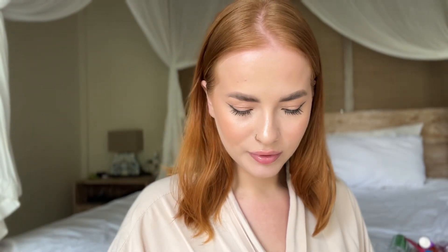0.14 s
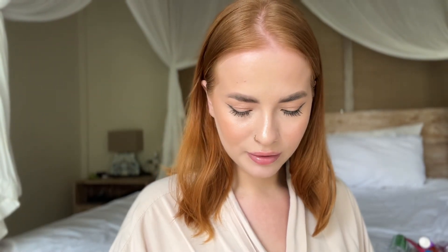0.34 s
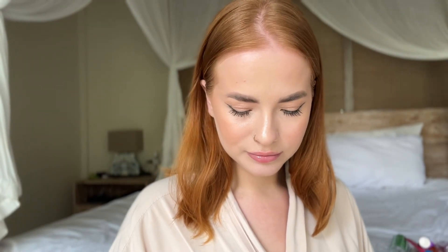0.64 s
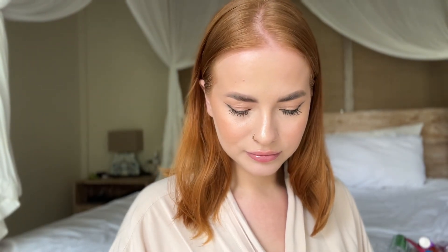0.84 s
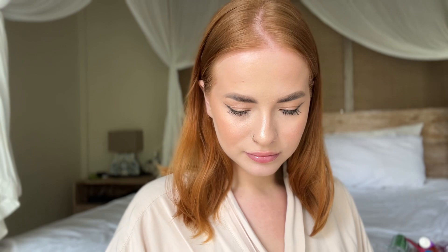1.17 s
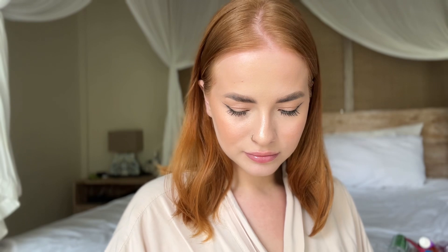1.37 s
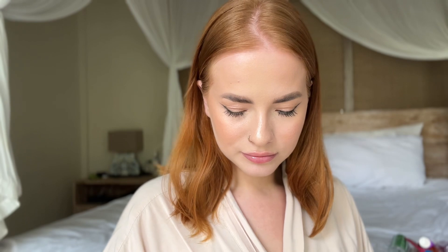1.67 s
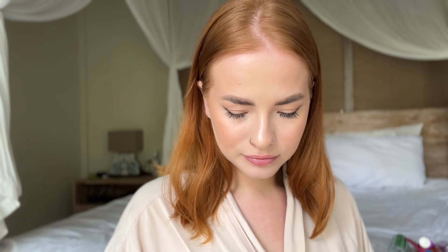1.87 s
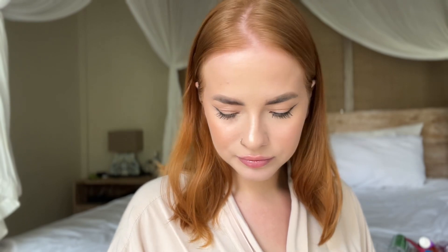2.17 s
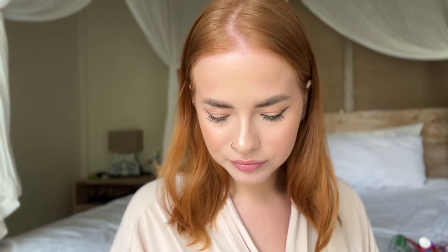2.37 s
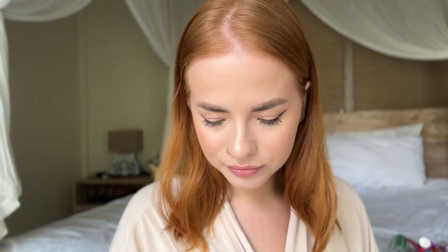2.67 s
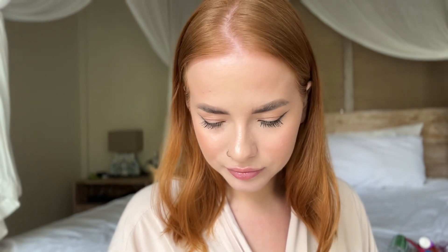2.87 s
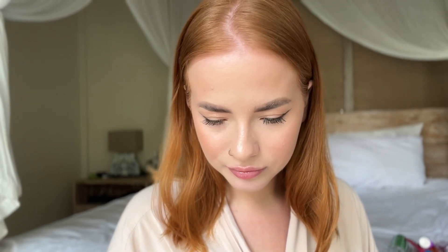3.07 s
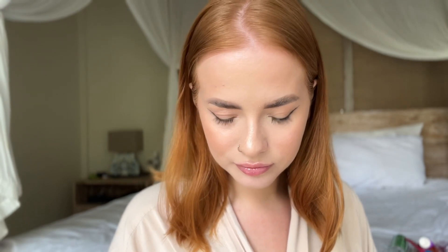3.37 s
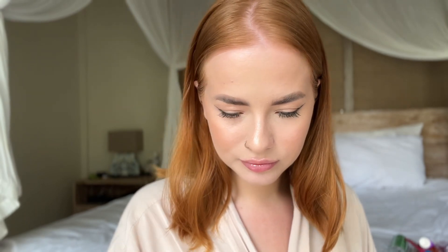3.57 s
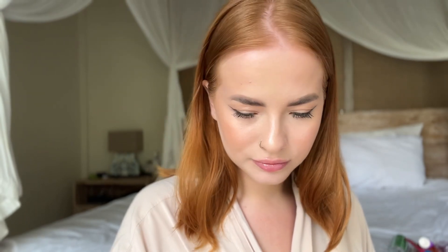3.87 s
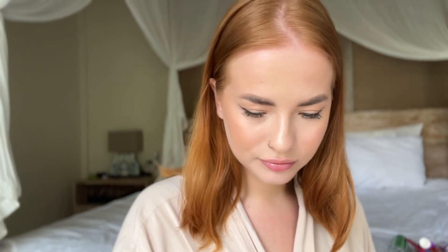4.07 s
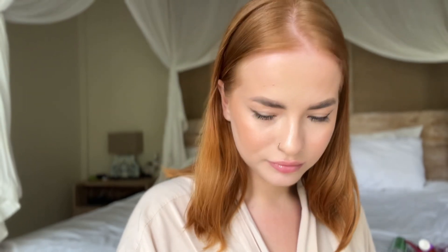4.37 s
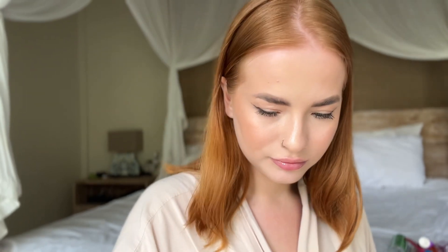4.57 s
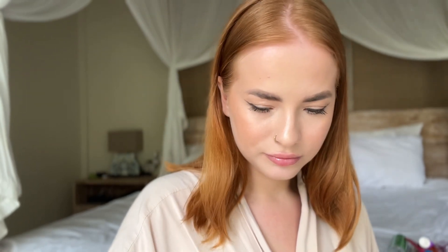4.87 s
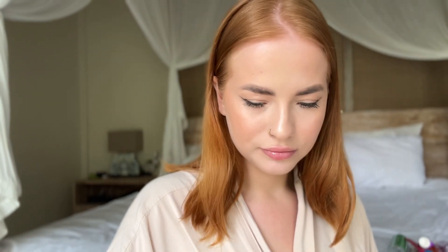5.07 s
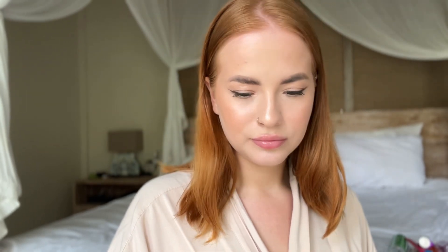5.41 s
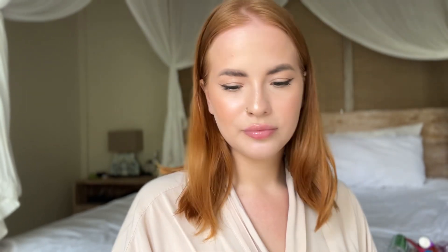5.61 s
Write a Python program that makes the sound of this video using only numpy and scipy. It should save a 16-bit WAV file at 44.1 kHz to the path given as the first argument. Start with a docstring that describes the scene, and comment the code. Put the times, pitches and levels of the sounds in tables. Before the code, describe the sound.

A close stereo pickup in a small quiet bedroom, with soft low hum, slight hiss and a very short room tail. From 0 to 0.3 s, plastic jars rattle together on a hard table: quick hollow clicks, a light dragging rattle and one firmer knock near 0.25 s. Quiet follows until a faint, low stuttering creak of a jar base at about 1.35-1.43 s. From 1.65 to 2.5 s comes the busiest handling: dense, irregular clacks with dull table thuds and brief rattling slips, with the sharpest, loudest crack at 1.75 s and another strong one at 2.27 s. It is then almost still, with tiny taps near 3.15-3.25 s and crisp, thin clicks at 3.6-3.75 s. From 4.1 to 4.75 s, lighter ticks and faint scrapes return in clusters. After a short pause, soft, duller knocks and slight drags continue from 5.1 s to the end, about 5.6 s.

```python
"""In a quiet bedroom, plastic jars are shuffled about on a hard table top, close to a two-port microphone.
Each knock is a click of shaped noise, a short ring of jar tones and a thud of lower table tones.
Dragging is a rattle of many tiny random slips; one jar base creaks through slips at an uneven rate.
Random echoes give a short room tail, and coloured noise gives a soft hum with a little hiss."""
import sys
import numpy as np
from scipy import signal
from scipy.fft import rfft, irfft
from scipy.io import wavfile
from scipy.ndimage import uniform_filter1d

SR = 44100
rng = np.random.default_rng(int(sys.argv[2]) if len(sys.argv) > 2 else 0)


def wav_out(sig):
    """Save sig, one row per channel (or a flat mono array), as 16-bit PCM at SR to the path in sys.argv[1]."""
    wavfile.write(sys.argv[1], SR, np.round(np.clip(np.atleast_2d(sig).T, -1, 1) * 32767).astype(np.int16))


N = 253287  # length in samples


def gain_of(db):
    """Turns decibels into amplitude."""
    return 10 ** (np.asarray(db) / 20)


def evened(x):
    """Scales a signal to an average (rms) strength of 1."""
    return x / np.sqrt(np.mean(x ** 2) + 1e-20)


def read(points, hz):
    """Reads a table of (pitch, value) between its points, along a log-frequency axis."""
    f, value = np.transpose(points)
    return np.interp(np.log(hz + 1), np.log(f + 1), value)


def coloured(x, spectrum):
    """Filters sound without looking ahead: the phase follows from the log of the wanted gain."""
    hz = abs(np.fft.fftfreq(2048, 1 / SR))
    log_gain = np.log(gain_of(np.maximum(read(spectrum, hz), -80)))
    response = np.exp(np.conj(signal.hilbert(log_gain)))
    taps = np.fft.ifft(response).real[:1024]
    return signal.oaconvolve(x, taps[None] / np.linalg.norm(taps), axes=1)[:, :N]


def ring(modes, struck_hz, spread, rise_s, length):
    """A blow excites mostly the tones near the struck pitch; length scales their fading; peak 1."""
    t = np.arange(SR // 5) / SR
    hz, db, t60 = np.transpose(modes)[:, :, None]
    near_db = -20 * (np.log2(hz / struck_hz) / spread) ** 2  # spread in octaves
    decay_db = -60 * t / (t60 * length)
    tones = gain_of(db + np.maximum(near_db, -30) + decay_db) * np.sin(2 * np.pi * hz * t)
    sound = tones.sum(0) * (1 - np.exp(-t / rise_s)) ** 2
    return sound / abs(sound).max()


def add(mix, s, sound, pan_db):
    """Adds a sound to both channels at time s; pan_db is left minus right."""
    at = round(s * SR)
    part = mix[:, at:at + len(sound)]
    part += gain_of([[pan_db / 2], [-pan_db / 2]]) * sound[:part.shape[1]]


# Knocks, with levels relative to the other layers: start_s, click_level_db, click_pitch_hz,
# jar_level_db, jar_struck_pitch_hz, table_level_db, table_struck_pitch_hz
KNOCKS = [(0.024, -47, 2190, -35.5, 665, -40.5, 374), (0.049, -51, 7300, -23.0, 670, -29.0, 507),
          (0.088, -37, 2600, -26, 770, -32, 362), (0.1003, -27.5, 6940, -21.5, 806, -32, 385),
          (0.1112, -33.5, 5000, -21.5, 780, -28, 380), (0.1498, -31, 2100, -19.5, 780, -40, 415),
          (0.1859, -38.5, 2180, -34.5, 1910, -37, 328), (0.194, -39, 3600, -31, 690, -33, 246),
          (0.23, -46, 2200, -44, 690, -37, 400), (0.2476, -22.5, 3130, -9, 670, -22.5, 400),
          (0.2667, -34, 2200, -25, 670, -30, 374), (0.2788, -21.5, 8700, -19.5, 806, -31, 458),
          (0.2882, -25.5, 2200, -21.5, 710, -26.5, 480), (1.6573, -22, 6160, -23, 980, -26.5, 341.5),
          (1.726, -20.0, 6450, -19.5, 727, -24, 445), (1.7376, -42, 4400, -18, 950, -26, 380),
          (1.7558, -2.5, 6500, -8, 1020, -17.5, 393), (1.765, -46, 5200, -24.0, 1090, -54, 300),
          (1.7996, -29, 6100, -23.0, 1080, -33.5, 188), (1.816, -32, 7260, -37, 1160, -42.0, 400),
          (1.904, -34.5, 7040, -45.0, 800, -59.0, 192), (1.918, -28, 7000, -33, 860, -38, 400),
          (1.927, -19.5, 7440, -18, 950, -33, 549), (1.9382, -26, 2700, -24.5, 640, -36, 430),
          (1.955, -27.5, 6440, -30, 725, -25.5, 338), (1.9694, -25.5, 7300, -23.5, 1090, -36, 394),
          (1.998, -46, 2200, -30, 740, -30.0, 390), (2.0332, -37, 4400, -26, 820, -51, 410),
          (2.055, -17, 3700, -18.5, 1457, -17.5, 413), (2.071, -30.0, 3900, -21, 784, -35, 310),
          (2.0831, -19.5, 5950, -29, 850, -29, 386), (2.092, -34.0, 5200, -34, 774, -22, 236),
          (2.1065, -33, 3800, -25.5, 930, -29, 180), (2.116, -34, 6400, -36, 980, -53, 400),
          (2.188, -32, 2200, -24, 1280, -24, 347), (2.2025, -15.5, 6560, -16.5, 884, -22, 278),
          (2.2104, -34, 6400, -26.0, 980, -26.5, 191), (2.217, -29.0, 2600, -30.5, 1510, -28.5, 400),
          (2.274, -7.5, 5700, -10, 1166, -18.5, 342), (2.3079, -16, 6300, -16.5, 1170, -25.5, 435),
          (2.3338, -20, 4000, -19.5, 940, -25, 238), (2.414, -17, 2200, -16.5, 777, -22.5, 355),
          (2.44, -37.0, 4300, -32, 940, -34, 400), (2.4609, -36, 3180, -27.5, 790, -37, 400),
          (2.561, -50.0, 3900, -39.5, 705, -44, 415), (3.143, -44.5, 6300, -44.5, 1220, -45, 312),
          (3.2412, -41.5, 3900, -36, 854, -41.5, 337), (3.255, -54, 2224, -38.5, 1003, -43.5, 186),
          (3.6228, -22, 7600, -37, 1680, -46.0, 151), (3.648, -35.5, 7600, -65.0, 1820, -62, 218),
          (3.668, -33.5, 7000, -43.5, 920, -46, 155), (3.741, -42, 2200, -53, 1470, -42, 300),
          (3.833, -63.0, 7600, -48, 930, -59.0, 400), (4.065, -59.0, 2200, -48.0, 890, -47, 445),
          (4.139, -26.5, 4760, -37, 1550, -36, 300), (4.153, -46, 2200, -41.0, 1500, -34.5, 300),
          (4.1677, -16, 4400, -21.5, 1610, -41, 410), (4.1802, -18.5, 2300, -28, 2380, -31, 380),
          (4.195, -33, 4300, -33, 1550, -33.5, 400), (4.2256, -36.5, 4100, -32.5, 542, -41, 467),
          (4.3226, -65.0, 7000, -47, 650, -33, 243), (4.3777, -37.5, 2160, -45, 530, -45, 294),
          (4.467, -42.5, 2200, -41.5, 880, -47.5, 148), (4.5007, -33.0, 3500, -36, 546, -34, 287),
          (4.509, -38, 2200, -40.0, 1580, -40, 400), (4.5344, -16.5, 6500, -27, 980, -28.5, 480),
          (4.5664, -36, 6700, -41, 640, -31, 234), (4.597, -34.5, 2230, -44, 1080, -58, 172),
          (4.632, -37, 2200, -36.5, 1310, -46, 480), (4.6417, -31.5, 4640, -29.5, 770, -34.5, 184),
          (4.662, -26, 2500, -25.5, 800, -52.0, 193), (4.6948, -34.5, 2200, -33.5, 815, -35.5, 330),
          (4.7127, -28.5, 7600, -34, 1880, -38.5, 200), (5.1103, -28.5, 3370, -25.5, 720, -33, 400),
          (5.141, -41.0, 4600, -48, 600, -34, 410), (5.161, -36, 2700, -44, 786, -32, 308),
          (5.189, -41.5, 3600, -36.5, 515, -35.5, 474), (5.272, -53, 7300, -35.5, 705, -32.0, 430),
          (5.3312, -38, 7200, -31.5, 610, -22.5, 510), (5.349, -40, 3900, -50, 600, -36, 480),
          (5.371, -25, 4770, -28.5, 656, -21.5, 423), (5.3858, -60.0, 3900, -57.0, 624, -31.5, 400),
          (5.453, -29.5, 2960, -26.5, 1040, -28, 398), (5.5653, -48.5, 6400, -37, 780, -32, 190)]
# Tones of the jars: pitch_hz, relative_level_db, time_to_fade_60_db_s (before length scaling)
JAR_TONES = [(670, 15, 0.023), (780, 12.5, 0.024), (884, 13.5, 0.019), (980, 19.5, 0.024),
             (1160, 21.5, 0.023), (1350, 21.5, 0.028), (1665, 15, 0.029), (1890, 14, 0.024),
             (2270, 5.5, 0.017)]
# Tones of the table top: pitch_hz, relative_level_db, time_to_fade_60_db_s (before length scaling)
TABLE_TONES = [(80, -18, 0.064), (146.5, -15, 0.19), (188, -2, 0.12), (240, -4.5, 0.046), (300, 6.5, 0.049),
               (400, 8.5, 0.071), (480, 15, 0.045)]
JAR_PAN_DB, TABLE_PAN_DB = -6.5, -2.5  # left minus right
SOFT_DB, HARD_DB = -28.5, -7  # click levels that count as soft and hard
SOFT_RING, HARD_RING = 0.7, 0.42  # ring length factors
SAG_DB = -7  # flex of the whole table top, relative to the thud
JAR_RISE_CYCLES, TABLE_RISE_CYCLES = 1.1, 0.85  # a blow that favours low tones is softer and slower


def knocks():
    """A blow cracks at the rim, then sets the jar and the table ringing."""
    clicks, rings, t = np.zeros((2, N)), np.zeros((2, N)), np.arange(1500) / SR
    noises = rng.standard_normal((len(KNOCKS), 1500))
    linger = gain_of(-20.5) * np.exp(-t / 0.0037)  # a faint noisy tail lingers after the crack
    shape = (1 - np.exp(-t / 0.00086)) ** 2 * (1.39 * np.exp(-t / 0.0015) + linger)
    sag = ring(TABLE_TONES, 80, .6, 0.0077, 0.38)  # blows flex the whole table top
    for knock, noise in zip(KNOCKS, noises):
        s, click_db, click_hz, jar_db, jar_hz, table_db, table_hz = knock
        # the tighter grip behind a harder blow shortens the ring
        hard = np.clip((click_db - SOFT_DB) / (HARD_DB - SOFT_DB), 0, 1) ** 2
        length = SOFT_RING + hard * (HARD_RING - SOFT_RING)
        # the struck rim colours the crack
        rim = 1.666 * signal.lfilter(*signal.iirpeak(click_hz, 1.8, SR), noise)
        # a low click is a dull one
        edge = signal.lfilter(*signal.butter(1, min(2 * click_hz, SR / 3), fs=SR), noise)
        jar = ring(JAR_TONES, jar_hz, 0.41, JAR_RISE_CYCLES / jar_hz, length)
        thud = ring(TABLE_TONES, table_hz, 0.39, TABLE_RISE_CYCLES / table_hz, length)
        add(clicks, s, gain_of(click_db) * shape * (0.87 * edge + rim), 0)
        add(rings, s, gain_of(jar_db) * jar, JAR_PAN_DB)
        add(rings, s, gain_of(table_db) * thud, TABLE_PAN_DB)
        add(rings, s, gain_of(table_db + SAG_DB) * sag, TABLE_PAN_DB)
    return clicks, rings


# Jars dragging and rattling: full_level_start_s, hold_s, relative_level_db,
# treble_share_db, rubbed_jar_pitch_hz
DRAGS = [(0.007, 0.29, -42.5, -13, 840), (1.749, 0.037, -31, -13, 1030), (1.84, 0.086, -51, -8, 1160),
         (1.943, 0.063, -48.5, -20, 920), (2.043, 0.022, -31.5, -12, 950), (2.123, 0.04, -57, -12, 980),
         (2.199, 0.0057, -31, -15, 1330), (2.33, 0.11, -74, -2, 1000), (2.424, 0.0059, -32.5, -13, 980),
         (3.24, 0.014, -52.5, -9, 916), (3.667, 0.039, -59, 2.5, 990), (4.117, 0.016, -59, 2, 1600),
         (4.16, 0.041, -39, -7.5, 1430), (4.365, 0.093, -55.5, -6, 796), (4.578, 0.062, -44, -11.5, 980),
         (4.704, 0.15, -51.5, -12.5, 800), (5.12, 0.042, -43, -14.5, 750), (5.25, 0.15, -52, -13, 700),
         (5.478, 0.096, -61, -20, 995)]
DRAG_RISE_DB_PER_S, DRAG_FALL_DB_PER_S = 241, 201


def drags():
    """Many tiny slips of uneven size shake jar and table; their edges give a fine crackle."""
    t, treble = np.arange(N) / SR, np.zeros(N)
    modes, u = np.concatenate([JAR_TONES, TABLE_TONES]), np.arange(SR // 5) / SR
    on_jar = np.arange(len(modes)) < len(JAR_TONES)
    level = np.zeros((len(modes), N))
    for s, hold_s, db, treble_db, rubbed_hz in DRAGS:
        span = slice(max(round((s - .25) * SR), 0), round((s + hold_s + .25) * SR))
        before = np.maximum(s - t[span], 0)
        after = np.maximum(t[span] - s - hold_s, 0)
        stroke = gain_of(db - DRAG_RISE_DB_PER_S * before - DRAG_FALL_DB_PER_S * after)
        # jar tones near the rubbed pitch stand out
        near_db = np.maximum(7 - 20 * (np.log2(modes[:, 0] / rubbed_hz) / .8) ** 2, -8) * on_jar
        level[:, span] += gain_of(near_db)[:, None] * stroke
        treble[span] += gain_of(treble_db) * stroke
    sizes = gain_of(2.5 * np.minimum(rng.exponential(1, N), 5))
    slips = sizes * (rng.random(N) < 1200 / SR)  # about 1200 slips per second
    slips = evened(slips * rng.choice([-1, 1], N))
    struck, shaken = rng.integers(0, len(modes), N), 0  # each slip shakes one tone
    for k, (hz, db, t60) in enumerate(modes):
        tone_db = db - 9.26 * np.log2(hz / 400) - 2.14 * (hz < 600)
        tone = gain_of(tone_db - 60 * u / (0.71 * t60)) * np.sin(2 * np.pi * hz * u)
        tone = tone * (1 - np.exp(-u / 0.0017))
        shaken = shaken + signal.oaconvolve(level[k] * slips * (struck == k), tone)[:N]
    # crackle comes in clumps
    gusts = gain_of(3.0 * evened(uniform_filter1d(rng.standard_normal(N), 150)))
    crackle = evened(gusts * (slips + .8 * rng.standard_normal(N))) * treble
    return crackle, gain_of([[-23], [-21]]) * shaken


# A jar base creaking: time_s, relative_level_db, slips_per_s (before the rate wavers)
CREAK = [(1.35, -51, 149), (1.365, -46, 160), (1.416, -41.5, 180), (1.431, -45, 148)]


def creak():
    """A jar base sticks and slips at a wavering rate; each slip is a small blow on jar and table."""
    s, db, rate = np.transpose(CREAK)
    t = np.arange(N) / SR
    waver = 1 + .12 * evened(uniform_filter1d(rng.standard_normal(N), 300))
    count = np.cumsum(np.interp(t, s, rate, 0, 0) * waver) / SR
    slip_db = np.interp(t, s, db) + 1.3 * rng.standard_normal(N)
    slips = np.diff(np.floor(count), prepend=0) * gain_of(slip_db)  # one slip per whole count
    late = np.clip((t - s[0]) / (s[-1] - s[0]), 0, 1)
    jar = 0
    for k, hz in enumerate([1400, 1080, 800]):  # the contact moves inwards, to lower jar tones
        share = np.maximum(1 - abs(2 * late - k), 0)
        jar = jar + signal.oaconvolve(slips * share, ring(JAR_TONES, hz, .35, 0.0005, 0.9))
    blow = 1.4 * ring(TABLE_TONES, 630, 0.285, 0.001, 0.55)
    squeak = gain_of(-15.5) * ring([(4160, 0, 0.013)], 4250, 1, .0003, 1)  # the rim squeaks faintly
    return gain_of([[-2.5], [2.5]]) * (jar + signal.oaconvolve(slips, blow + squeak))[:N]


# Tone colour of clicks and crackle: pitch_hz, relative_level_db (per hz)
CLICK_COLOUR = [(900, -29.5), (1500, -11.5), (1950, -7), (2500, -5.5), (3400, -10), (5600, -16.5),
                (7600, -24.5), (10000, -17.5), (13500, -30.5), (16000, -33)]
# Treble change on the left port: pitch_hz, gain_db
LEFT_SHADE = [(1500, 6.5), (3000, -10.5), (5000, -15), (8000, -14), (14000, 2.5)]


def bright_edges(clicks, crackle):
    """Filters give clicks and crackle one tone colour, with much of the treble shaded on the left."""
    treble = coloured(clicks + crackle, CLICK_COLOUR)
    hz = np.fft.rfftfreq(N, 1 / SR)
    treble[0] = irfft(rfft(treble[0]) * gain_of(read(LEFT_SHADE, hz)), N)
    return treble


# How fast the room tail dies: pitch_hz, time_to_fade_60_db_s
ROOM_FADE = [(150, 0.13), (600, 0.23), (2500, 0.092), (8000, 0.17)]


def room(x):
    """Sparse echoes of random sign, different for each port, with each band dying at its own speed."""
    taps = np.zeros((2, SR // 2))
    slots = np.arange(120, SR // 2 - 20, 20)
    at = slots + rng.integers(0, 20, (2, len(slots)))
    np.put_along_axis(taps, at, rng.choice([-1., 1.], at.shape), 1)
    hz, t, z = signal.stft(taps, SR, nperseg=128)
    fade = gain_of(-60 * t / read(ROOM_FADE, hz)[:, None])
    tail = signal.istft(z * fade, SR, nperseg=128)[1]
    return signal.fftconvolve(x[None], tail / np.linalg.norm(tail[0]), axes=1)[:, :N]


# Tone colour of hum and hiss: pitch_hz, relative_level_db (per hz)
AIR_COLOUR = [(20, -46.5), (65, 0.5), (107, -8.5), (142, -2.5), (168, -7.5), (285, -10), (367, -18.5),
              (513, -19.5), (780, -27), (2080, -27.5), (3070, -32.5), (12800, -47.5), (16000, -69.5)]
# How alike the two channels are: pitch_hz, likeness (1 same, 0 unrelated, -1 opposite)
AIR_SAME = [(60, 0.95), (180, 0.82), (550, 0.14), (1650, -0.27), (4970, 0.24), (15000, -0.79)]
# Balance of the channels: pitch_hz, left_minus_right_db
AIR_BALANCE = [(60, -1.5), (240, -1), (3770, 3.0), (15000, 0)]
AIR_DB = -50  # overall rms level


def air():
    """Room hum and microphone hiss: random short-time spectra with faint drifting patches."""
    frames, hz = N // 512 + 5, np.fft.rfftfreq(2048, 1 / SR)
    a, b, c, d, patches = rng.standard_normal((frames, 1025, 5)).T
    patches = evened(uniform_filter1d(uniform_filter1d(patches, 20, 0), 8, 1))
    same = np.clip(read(AIR_SAME, hz), -1, 1)[:, None]
    left = a + 1j * b
    right = same * left + np.sqrt(1 - same ** 2) * (c + 1j * d)
    tilt_db = read(AIR_BALANCE, hz)[:, None] / 2
    colour_db = read(AIR_COLOUR, hz)[:, None] + 2.1 * patches
    z = np.array([left, right]) * gain_of(colour_db + np.array([tilt_db, -tilt_db]))
    noise = signal.istft(z, nperseg=2048, noverlap=1536)[1][:, :N]
    return gain_of(AIR_DB) * evened(noise)


LEFT_LAG = 7  # samples by which near sound reaches the left port later


def scene():
    """Near sounds reach the right port first; room tail and hum surround them."""
    clicks, rings = knocks()
    crackle, shaken = drags()
    treble = bright_edges(clicks, crackle)
    near = treble + rings + shaken + creak()
    direct = np.array([np.roll(near[0], LEFT_LAG), near[1]])
    tail = gain_of(-9.5) * room((near + 0.13 * treble).mean(0))
    return direct + tail + air()


def record(dry):
    """The microphone drops the deepest bass, loud peaks round off, and the top treble is cut."""
    lean = signal.sosfilt(signal.butter(4, 45, "high", fs=SR, output="sos"), dry)
    band_limit = signal.firwin(511, 16400, window=("kaiser", 9), fs=SR)  # cutoff in Hz
    return signal.oaconvolve(np.tanh(lean), band_limit[None], "same")


dry = scene()
out = record(dry)
wav_out(out)
```